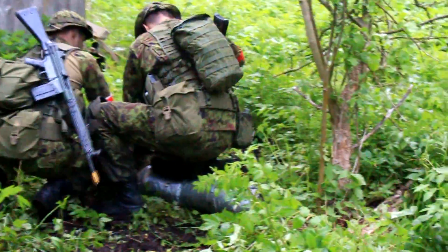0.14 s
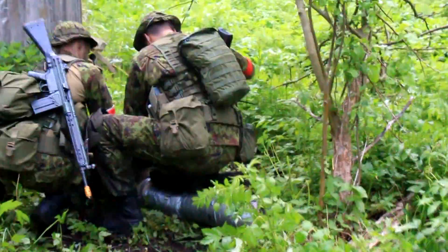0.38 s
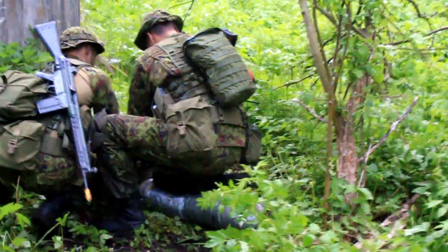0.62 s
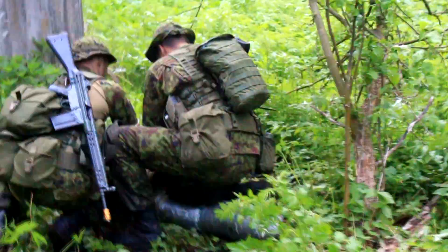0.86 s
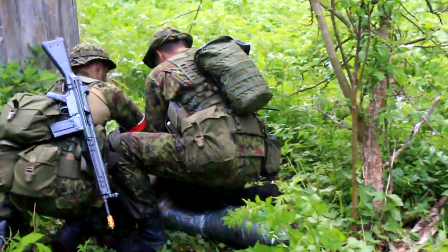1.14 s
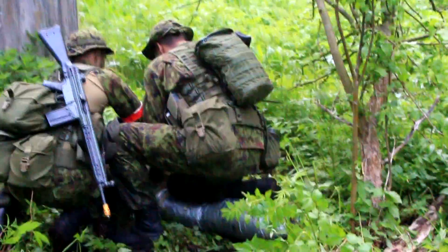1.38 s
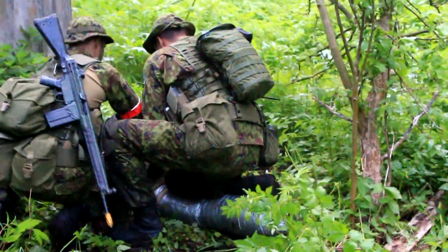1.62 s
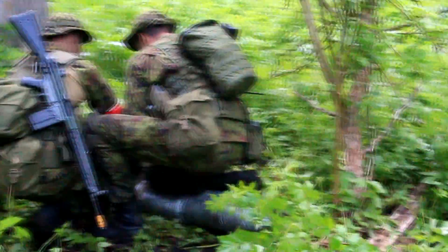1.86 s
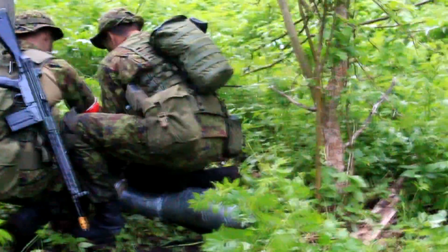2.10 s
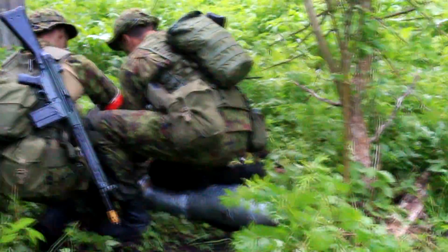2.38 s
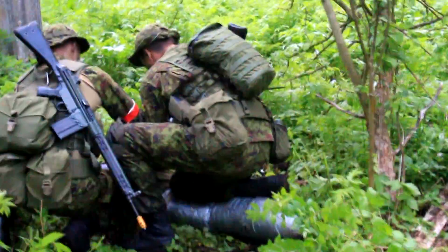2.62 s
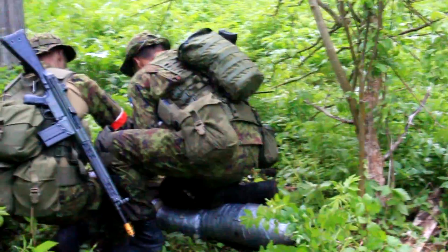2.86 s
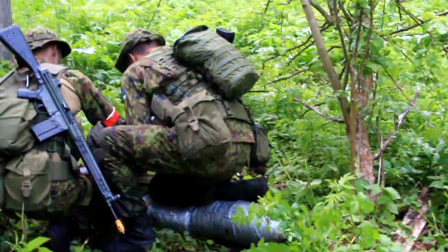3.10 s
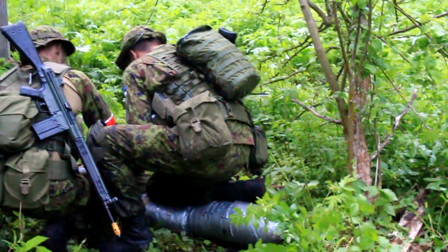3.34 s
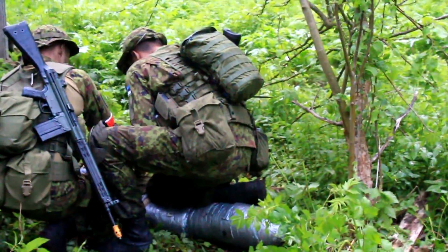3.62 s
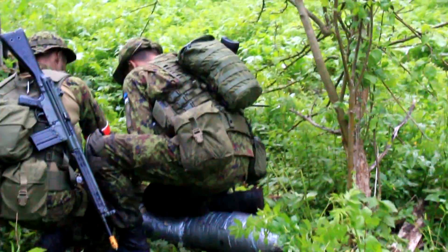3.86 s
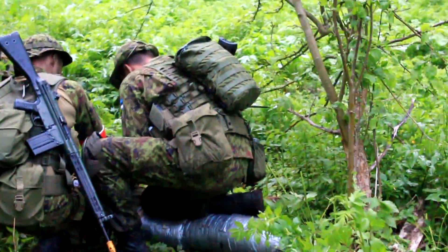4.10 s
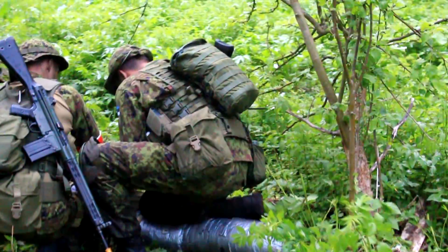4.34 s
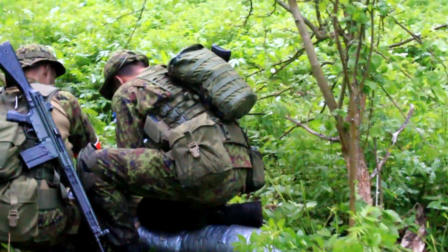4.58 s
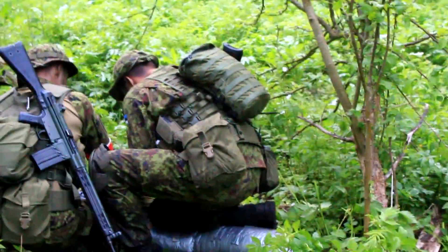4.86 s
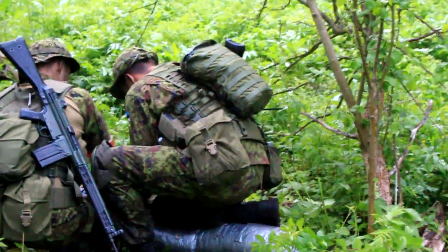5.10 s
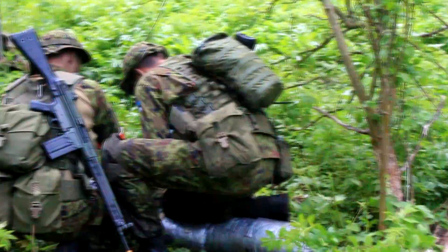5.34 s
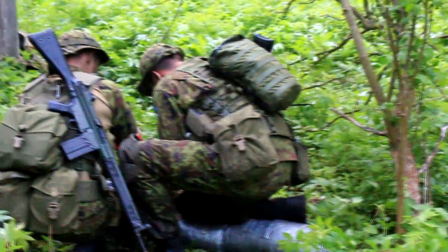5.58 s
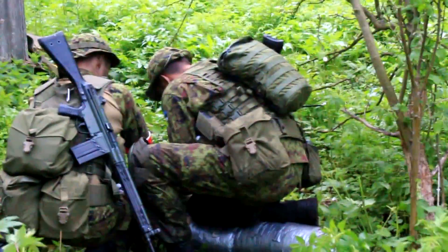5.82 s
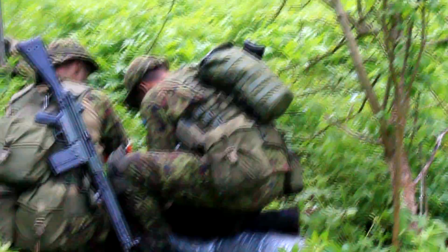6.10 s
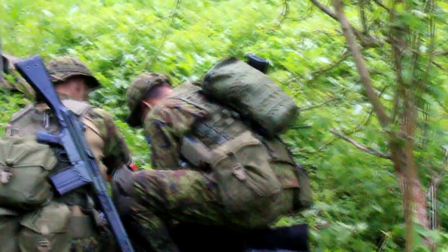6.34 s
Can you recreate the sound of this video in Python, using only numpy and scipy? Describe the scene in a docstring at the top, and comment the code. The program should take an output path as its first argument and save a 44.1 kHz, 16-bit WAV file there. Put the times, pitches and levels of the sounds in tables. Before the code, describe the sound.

Stereo woodland ambience with people shifting in brush close to the microphone: dull thumps, knocks, small snaps and brief cloth swishes, busiest from one and a half to two and a half seconds. A steady little warbler sings throughout most of it. Later, distant birds flick, chirrup and buzz, and the near thrush returns with whistles and a warble that echo softly among the trunks.

```python
"""Woodland undergrowth: a thrush pips close on the right over a low drone and rustling leaves.
A small warbler repeats dropping notes; fainter voices whistle, rasp and chirrup, all as gliding near-pure tones.
Bodies shift in the brush nearby: twigs snap and gear knocks as bursts of decaying modes, cloth swishes as shaped noise.
The bed is spectrally shaped stereo noise with microphone hiss; trunks scatter the birds and blows into noise tails."""
import sys
import numpy as np
from scipy import signal
from scipy.fft import rfft, irfft, next_fast_len
from scipy.io import wavfile
from scipy.ndimage import uniform_filter1d

SR = 44100
rng = np.random.default_rng(int(sys.argv[2]) if len(sys.argv) > 2 else 0)


def wav_record(signal):
    """Record a signal, one row per channel, as 16-bit PCM in the file named by sys.argv[1]."""
    frames = np.transpose(np.atleast_2d(signal))
    bounded = np.clip(frames, -1, 1)
    # unit amplitude maps onto the largest positive 16-bit level
    quanta = np.round(bounded * 32767).astype(np.int16)
    wavfile.write(sys.argv[1], SR, quanta)


def volts_from_decibels(level):
    """Turn decibel levels (scalar or array-like) into linear amplitude factors."""
    exponent = np.asarray(level, float) / 20
    return 10 ** exponent


N = 284445

# whistles of birds further off: (time [s], length [s], start pitch [Hz], end pitch [Hz],
# level before placing [dB], bend [name])
FAR_WHISTLES = [(0.491, 0.07, 2270, 1778, -47.5, "scoop"), (0.894, 0.092, 3900, 3910, -55.5, "glide"),
                (4.682, 0.015, 2920, 1940, -47.5, "glide"), (4.843, 0.035, 2290, 3020, -51.5, "glide"),
                (5.243, 0.037, 2110, 2183, -50, "scoop"), (.53, 0.042, 4570, 4060, -43.5, "droop"),
                (0.965, 0.083, 4500, 3630, -45.5, "glide"), (1.595, 0.049, 3810, 2980, -42, "glide"),
                (1.739, 0.04, 3300, 3390, -41, "scoop"), (1.872, 0.035, 4400, 3700, -47, "lean"),
                (2.869, 0.024, 3834, 3830, -46, "glide"), (3.2, 0.014, 3930, 3870, -45, "glide"),
                (3.811, 0.067, 3190, 3670, -55.5, "glide"), (3.871, 0.044, 3750, 3890, -47, "scoop"),
                (4.503, 0.07, 3564, 5570, -40.5, "droop"), (4.565, 0.072, 5410, 4990, -37.5, "scoop"),
                (4.493, 0.047, 5780, 5860, -49.5, "lean"), (4.694, 0.022, 3260, 2810, -43, "glide"),
                (4.96, 0.012, 4250, 4050, -43, "droop"), (4.965, .016, 3590, 3504, -34.5, "scoop"),
                (4.983, 0.01, 3420, 2690, -38.5, "glide"), (5.122, 0.01, 4750, 4430, -31.5, "scoop"),
                (6.426, 0.036, 5560, 4500, -48, "glide")]
FAINT_DB = -46.2  # far whistles below this level come from deep in the wood


def unit(x):
    """Normalisation by root mean square: scales a signal to rms 1."""
    return x / np.sqrt(np.mean(x ** 2) + 1e-20)


def along(points, hz):
    """Logarithmic frequency scale: interpolates (frequency [Hz], value) points along it."""
    f, v = np.transpose(points)
    return np.interp(np.log(hz + 1), np.log(f + 1), v)


def filtered(x, response):
    """Linear filtering: multiplies the spectrum of x by a response of frequency."""
    m = next_fast_len(N + SR // 4)
    spectrum = rfft(x, m) * response(np.fft.rfftfreq(m, 1 / SR))
    return irfft(spectrum, m)[..., :N]


def add(track, s, sound):
    """Superposition: lays a sound into a track at time s."""
    part = track[round(s * SR):][:len(sound)]
    part += sound[:len(part)]


def sing(hz, level, rough=0.011):
    """Frequency modulation: a syrinx gives nearly a pure tone; moving leaves on the way make it flutter."""
    flutter = 1 + rough * unit(uniform_filter1d(rng.standard_normal(len(hz)), 150))
    phase = 2 * np.pi * np.cumsum(hz) / SR + rng.uniform(0, 2 * np.pi)
    return np.sqrt(2) * level * flutter * np.sin(phase)


def whistles(rows, soft, rough):
    """Pitch glide: each tone bends from its start to its end pitch under a rounded swell."""
    # bend [name]: share of the pitch change done halfway through [ratio]
    halfway = {"scoop": 0.96, "lean": .7, "glide": 0.46, "droop": 0.17}
    out = np.zeros(N)
    for s, length, start_hz, end_hz, db, bend in rows:
        u = np.linspace(0, 1, round(length * SR))
        done = u + (4 * halfway[bend] - 2) * u * (1 - u)
        hz = start_hz + (end_hz - start_hz) * done
        swell = np.abs(np.sin(np.pi * u ** 1.11)) ** soft
        add(out, s, sing(hz, volts_from_decibels(db) * swell, rough))
    return out


def pips(group, length):
    """Rising onset: whistle rows for one group of short pips, which scoop up to their pitch."""
    # "near": the thrush's pips; "far": fainter pips, the first ones perhaps the thrush's, in two voices;
    # each group [name] holds rows of (time [s], final pitch [Hz], level before placing [dB])
    pip_rows = {"near": [(.078, 2666, -32.5), (.107, 2783, -31.5), (.14, 2790, -28.5), (.172, 2647, -33)],
                "far": [(4.365, 3550, -47), (4.412, 3690, -43.5), (4.412, 5700, -45), (4.458, 3760, -45.5),
                (4.458, 5910, -42), (4.805, 2820, -43), (5.203, 3000, -40.5), (5.262, 2990, -43.5)]}
    scoop_hz = 298
    return [(s, length, hz - scoop_hz, hz, db, "scoop") for s, hz, db in pip_rows[group]]


def warbler():
    """Piecewise-linear pitch contour: a steep drop from the top, a held pitch, a weak fall."""
    # notes, shaped in turn: (time the onset ends [s], held level before placing [dB])
    notes = [(0.803, -49), (1.133, -50), (1.457, -45), (1.779, -46.5), (2.094, -48), (2.424, -42.5),
             (2.746, -43.5), (3.082, -44), (3.435, -45.5), (3.752, -45.5), (4.099, -48), (4.46, -44),
             (4.784, -42.5), (5.115, -46.5)]
    # shape [name]: (held pitch [Hz], hold [s], final pitch [Hz], final fall [s],
    # end of the fall over the held part [dB], end of the drop over the held part [dB])
    shapes = {"high": (6000, .022, 3800, .012, -5, 4), "mid": (4520, .026, 3750, .04, -11, 4.5),
              "low": (3770, .066, 3750, .01, -5, 2)}
    # order in which the notes take their shapes [name]
    shape_order = ["high", "low", "mid"]
    top_hz, shoulder_hz = 6910, 6450  # where a note starts and where it turns
    overshoot_hz = 139  # the drop lands this far above the held pitch
    onset_s, drop_s, settle_s, stop_s = .004, .014, .006, .003
    out = np.zeros(N)
    for k, (s, db) in enumerate(notes):
        held_hz, hold, final_hz, fall, fall_db, drop_db = shapes[shape_order[k % len(shape_order)]]
        knots = np.cumsum([0, onset_s, drop_s, settle_s, hold, fall, stop_s])
        t = np.arange(round(knots[-1] * SR)) / SR
        pitches = [top_hz, shoulder_hz, held_hz + overshoot_hz, held_hz, held_hz, final_hz, final_hz]
        hz = uniform_filter1d(np.interp(t, knots, pitches), size=90)
        level_db = db + np.interp(t, knots, [-40, -3, drop_db, 0, 0, fall_db, -40])
        add(out, s - onset_s, sing(hz, volts_from_decibels(level_db), rough=0.45))
    return out


def thrush():
    """Source and resonance: whistles, and warbles that snap up and slide down; the throat favours one band."""
    # whistles: (time [s], length [s], start pitch [Hz], end pitch [Hz],
    # level before throat and placing [dB], bend [name])
    near_whistles = [(.38, 0.037, 4190, 2533, -29.5, "glide"), (5.57, 0.051, 1890, 2566, -42.5, "lean"),
                     (5.624, 0.048, 4410, 4540, -35.5, "scoop"), (5.66, 0.038, 4550, 4920, -30.5, "glide"),
                     (5.635, 0.058, 5080, 5310, -42, "scoop"), (5.84, 0.026, 3440, 3724, -29.5, "lean"),
                     (5.963, 0.02, 1500, 2280, -48, "glide"), (5.98, 0.13, 2236, 2285, -38, "droop"),
                     (6.082, 0.044, 2787, 2030, -38, "glide")]
    # warbles: (time [s], start of mean pitch [Hz], end of mean pitch [Hz], swing rate [1/s],
    # level before envelope, throat and placing [dB])
    warbles = [(0.3121, 2668, 4234, 66, -28.5), (5.769, 3544, 3150, 95, -32.5)]
    warble_s, swing_hz, swing_fades = .072, 720, .35  # the swing loses this share by the end
    out = whistles(near_whistles + pips("near", length=.015), soft=0.47, rough=0.15)
    for s, start_hz, end_hz, rate, db in warbles:
        u = np.linspace(0, 1, round(warble_s * SR))
        turn = u * warble_s * rate % 1
        mean_hz = end_hz + (start_hz - end_hz) * (1 - u) ** 2
        swing = swing_hz * (1 - swing_fades * u) * np.interp(turn, [0, .25, 1], [-1, 1, -1])
        pulse = np.interp(turn, [0, .2, .5, 1], [.3, .6, 1, .3])
        level = pulse * (.6 + .4 * u) * np.clip(30 * (1 - u), 0, 1)
        add(out, s, sing(uniform_filter1d(mean_hz + swing, 40), volts_from_decibels(db) * level))
    return filtered(out, lambda hz: 1 + 1.48 / (1 + ((hz - 3800) / 400) ** 2))


def snaps():
    """Modal excitation: each blow rings the same short modes, strengths and pitches varied, with splinter noise."""
    # snaps and knocks: (time [s], reference level [dB], kind [name])
    blow_rows = [(0.24, -28.5, "thump"), (0.792, -43.5, "tick"), (0.834, -32.5, "knock"),
                 (0.93, -37.5, "snap"), (0.995, -45, "click"), (1.012, -43, "tick"), (1.096, -34, "knock"),
                 (1.503, -31.5, "thump"), (1.596, -28.5, "knock"), (1.62, -38, "thump"),
                 (1.669, -28.5, "tick"), (1.846, -26.5, "thump"), (1.9488, -37.5, "click"),
                 (1.957, -12.5, "crack"), (2.053, -25, "snap"), (2.198, -47.5, "tick"),
                 (2.299, -24.5, "snap"), (2.378, -41.5, "click"), (2.74, -38, "click"),
                 (3.302, -44, "click"), (3.326, -28, "snap"), (3.387, -29, "knock"), (3.425, -45.5, "tick"),
                 (4.105, -39.5, "tick"), (4.245, -34, "knock"), (4.429, -34, "snap"), (4.58, -35, "knock"),
                 (4.659, -42, "knock"), (4.732, -40.5, "snap"), (4.789, -31, "knock"),
                 (5.316, -37.5, "snap"), (5.88, -37.5, "knock"), (5.906, -42, "tick"),
                 (6.269, -42.5, "tick"), (6.362, -38, "snap"), (6.431, -33, "knock")]
    # kind [name], from soft gear on a stem to a dry twig breaking:
    # (crack over reference [dB], tick over reference [dB])
    balance = {"thump": (-13, -32), "knock": (0.5, -12), "snap": (11.1, 0), "crack": (14, -4),
               "click": (15.2, -23), "tick": (17, 8.5)}
    # modes of the stem: (nominal frequency [Hz], relative level [dB], t60 [s])
    stem_modes = [(555, -5.5, 0.029), (695, 4.5, 0.01), (1042, 16, 0.0053)]
    # modes of the split fibres: (nominal frequency [Hz], relative level [dB], t60 [s])
    fibre_modes = [(1900, -14.5, 0.0088), (3220, 5.5, 0.0039), (4220, 11.5, 0.0019), (4850, 11.5, 0.0022)]
    # modes of the bright edge: (nominal frequency [Hz], relative level [dB], t60 [s])
    edge_modes = [(7740, 11, 0.0041), (10600, 8, 0.002), (14000, -21, .003)]
    # a knee or pack meets soft ground: (time [s], frequency [Hz], peak before placing [dB])
    thuds = [(0.423, 102, -41), (2.312, 171, -28.5), (3.562, 320, -39), (3.619, 318, -40)]
    out, t = np.zeros(N), np.arange(SR // 10) / SR
    for s, db, kind in blow_rows:
        crack_db, tick_db = balance[kind]
        parts = ((stem_modes, db - 4.5), (fibre_modes, db + crack_db), (edge_modes, db + tick_db))
        for modes, part_db in parts:
            for hz, mode_db, t60 in modes:
                a, b = rng.standard_normal(2)
                ring = volts_from_decibels(part_db + mode_db + a - 60 * t / t60) * (1 - np.exp(-t / 0.00076))
                add(out, s + .0007, ring * np.sin(2 * np.pi * hz * (1 + b / 25) * t))
        # the kernel removes the lowest and highest frequencies
        splinters = np.convolve(rng.standard_normal(len(t)), [1, 1, -1, -1])[:len(t)]
        add(out, s, volts_from_decibels(db + tick_db - 22.5 - 60 * t / 0.095) * splinters)
    for s, hz, db in thuds:
        swell = (t * hz) ** 2 * np.exp(2 - 2 * t * hz)  # about two soft cycles
        add(out, s, -volts_from_decibels(db) * swell * np.cos(2 * np.pi * hz * t))
    return out


def swishes():
    """Band-limited friction noise: branches drawn over cloth give a quick rise and a slower fall of grit."""
    # strokes: (time [s], length [s], centre frequency [Hz], rms level [dB])
    strokes = [(1.478, 0.62, 690, -47.5), (1.66, 0.091, 3780, -42), (1.95, 0.092, 4420, -48),
               (2.299, 0.068, 6000, -58), (3.334, 0.12, 4900, -53), (4.898, 0.1, 10900, -55),
               (5.051, 0.08, 1320, -46.5)]
    out = np.zeros((2, N))
    for s, length, centre_hz, db in strokes:
        u = np.linspace(0, 1, round(length * SR))
        grain = volts_from_decibels(4.5 * unit(uniform_filter1d(rng.standard_normal(len(u)), 180)))
        grit = rng.standard_normal((2, len(u))) * grain
        edges = np.clip([centre_hz / 2.65, centre_hz * 1.66], 50, SR * .45)
        band = signal.butter(2, edges, "band", fs=SR, output="sos")
        left, other = signal.sosfilt(band, grit)
        stroke = volts_from_decibels(db) * unit(u ** 0.4 * (1 - u))
        add(out[0], s, stroke * unit(left))
        add(out[1], s, stroke * unit(1.6 * left + other))  # partly alike on both sides
    return out


def buzzes():
    """Random frequency modulation: the pitch jumps about faster than the ear follows, a rasp or a blur."""
    # rasped notes, and from 6.09 s blurred echoes of the thrush:
    # (time [s], length [s], start pitch [Hz], end pitch [Hz], level before placing [dB], rasp [name])
    buzz_rows = [(1.25, 0.105, 3880, 4600, -47.5, "hoarse"), (4.87, 0.054, 4850, 4600, -42, "hoarse"),
                 (4.879, 0.087, 4230, 4024, -41, "hoarse"), (4.91, 0.065, 2100, 1900, -50, "hoarse"),
                 (4.947, 0.042, 5000, 4660, -40, "rough"), (4.985, .04, 3600, 2790, -48, "rough"),
                 (5.396, 0.033, 3700, 3430, -45, "rough"), (5.472, 0.045, 4030, 3360, -45.5, "harsh"),
                 (6.094, 0.16, 2450, 2190, -49.5, "rough"), (6.139, 0.13, 3620, 3500, -49, "rough"),
                 (6.246, 0.042, 2346, 1900, -45, "hoarse"), (6.297, 0.041, 2070, 1698, -43.5, "rough")]
    # rasp [name]: rms pitch scatter as a share of the pitch [ratio]
    scatter = {"hoarse": 0.035, "rough": 0.094, "harsh": 0.164}
    out = np.zeros(N)
    for s, length, start_hz, end_hz, db, rasp in buzz_rows:
        u = np.linspace(0, 1, round(length * SR))
        jumps = unit(uniform_filter1d(uniform_filter1d(rng.standard_normal(len(u)), 35), 35))
        hz = (start_hz + (end_hz - start_hz) * u) * (1 + scatter[rasp] * jumps)
        swell = np.abs(np.sin(np.pi * u)) ** 0.12
        add(out, s, sing(hz, volts_from_decibels(db) * swell, rough=0.52))
    return out


def chirrups():
    """Two-voiced tones: each voice throws its pitch up in an arch and back down."""
    # calls: (time [s], level before placing [dB])
    calls = [(5.379, -37.5), (5.459, -35)]
    # pitch arches of a call: (delay [s], length [s], start pitch [Hz], top pitch [Hz], end pitch [Hz],
    # level relative to the call [dB])
    arches = [(0, .017, 3840, 5510, 3770, -1), (.001, 0.015, 2900, 3640, 3020, -3.5),
              (.018, .03, 3960, 5100, 3900, -3)]
    out = np.zeros(N)
    for s, db in calls:
        for delay, length, start_hz, top_hz, end_hz, arch_db in arches:
            u = np.linspace(0, 1, round(length * SR))
            rise_hz = top_hz - (start_hz + end_hz) / 2
            hz = start_hz + (end_hz - start_hz) * u + rise_hz * np.sin(np.pi * u)
            swell = np.abs(np.sin(np.pi * u)) ** .5
            add(out, s + delay, sing(hz, volts_from_decibels(db + arch_db) * swell, rough=.3))
    return out


def fainter_birds(count=5):
    """Gliding tones: whistles, fainter pips, upward flicks, chirrups and a thin high series loudest mid-way."""
    # quick upward flicks: (time [s], start pitch [Hz], end pitch [Hz], level before placing [dB])
    flick_rows = [(4.717, 3020, 5050, -31.5), (5.116, 2890, 4980, -39.5), (5.237, 2650, 3220, -35)]
    flicks = [(s, .012, start_hz, end_hz, db, "lean") for s, start_hz, end_hz, db in flick_rows]
    # a thin high bird repeats one drooping note at a steady pace
    first_s, every_s, seep_s = .655, .146, .065
    seep_hz, seep_end_hz = 7550, 7150
    seeps = []
    for k in range(count):
        seep_db = -61 + 6 * np.sin(np.pi * (k + .5) / count)
        seeps.append((first_s + k * every_s, seep_s, seep_hz, seep_end_hz, seep_db, "droop"))
    clear = [row for row in FAR_WHISTLES if row[4] >= FAINT_DB]
    rows = clear + pips("far", length=0.0206) + flicks + seeps
    return chirrups() + whistles(rows, soft=0.083, rough=0.33)


def deep_birds():
    """Level as a distance cue: the faintest whistles, from deep in the wood."""
    return whistles([row for row in FAR_WHISTLES if row[4] < FAINT_DB], soft=0.27, rough=0.23)


def rush(spectrum, patchy_db, grains=0, grain_db=0):
    """Shaped noise with set interaural correlation: rms 1, patches of gain, sparse crackles (grains a second)."""
    # left-right likeness: (frequency [Hz], correlation [ratio])
    likeness = [(40, 0.31), (130, 0.94), (600, 0.33), (4000, 0.46), (11000, -0.26)]
    z = signal.stft(rng.standard_normal((2, N)), nperseg=512)[2]
    field = uniform_filter1d(uniform_filter1d(rng.standard_normal(z.shape[1:]), 5, 0), 8, 1)
    pair = unit(signal.istft(z * volts_from_decibels(patchy_db * unit(field)), nperseg=512)[1][:, :N])
    strength = volts_from_decibels(grain_db + 4 * rng.exponential(size=N).clip(0, 2.5))
    spikes = (rng.random(N) < grains / SR) * strength
    # each crackle flares and dies in a millisecond or two
    pair = pair * (1 + np.convolve(spikes, np.exp(-np.arange(200) / 40))[:N])

    def mid_side(hz):
        turn = np.arccos(np.clip(along(likeness, hz), -1, 1)) / 2
        colour = volts_from_decibels(along([(1, -120)] + spectrum + [(SR, -120)], hz))
        return colour * [np.cos(turn), np.sin(turn)]

    mid, side = filtered(pair, mid_side)
    return unit(np.array([mid + side, mid - side]))


def bed():
    """Shaped noise under slow levels: drone in two humps, crackling leaves, microphone hiss, blurred far song."""
    # slow levels: (time [s], drone level before tilt [dB], leaf rustle level [dB],
    # far chorus level before tilt [dB])
    slow_levels = [(0, -52, -49.5, -45.5), (.7, -47.5, -48.5, -46), (1.2, -52.5, -49, -49.5),
                   (1.9, -55, -58, -45.5), (2.2, -53, -53.5, -51), (2.9, -49.5, -55.5, -52.5),
                   (3.6, -52.5, -52.5, -52.5), (4.1, -52.5, -54.5, -52.5), (4.9, -56, -53.5, -49.5),
                   (5.4, -49, -50.5, -49), (6, -50, -50, -49.5), (6.45, -49.5, -57, -52)]
    # drone spectrum: (frequency [Hz], relative density [dB])
    drone_colour = [(30, -26), (70, -16.5), (130, 0), (195, -10.5), (255, -4.5), (340, -14.5), (500, -20.5)]
    # leaf rustle spectrum: (frequency [Hz], relative density [dB])
    leaf_colour = [(150, -20), (400, 2), (1100, 1.5), (1800, -3), (4000, -10), (8000, -30), (12000, -33)]
    # smooth high microphone hiss spectrum: (frequency [Hz], relative density [dB])
    hiss_colour = [(2500, -20), (6500, 2), (10000, -2), (15500, -5.5)]
    # distant song spectrum: (frequency [Hz], relative density [dB])
    chorus_colour = [(1800, -9), (2700, -6.5), (3800, -1), (5200, -5.5), (6400, -11), (7500, -11),
                     (9000, -18.5)]
    s, *columns = np.transpose(slow_levels)
    t = np.arange(N) / SR
    drone, leaves, chorus = (volts_from_decibels(np.interp(t, s, column)) for column in columns)
    rustle = leaves * rush(leaf_colour, patchy_db=2.5, grains=44, grain_db=4.0)
    hiss = volts_from_decibels(-64) * rush(hiss_colour, patchy_db=.4, grains=12, grain_db=4)
    # drone and chorus lean slightly to the right
    hum = drone * rush(drone_colour, patchy_db=2) * volts_from_decibels([[-.8], [.8]])
    song = chorus * rush(chorus_colour, patchy_db=1.8) * volts_from_decibels([[-1], [1]])
    return rustle + hiss + hum + song


def trees(x, stretch):
    """Diffuse scattering: trunks and leaves return a decaying noise tail, a new one each third of a second."""
    # decay of the wood: (frequency [Hz], t60 before stretch [s])
    wood_decay = [(300, .3), (2000, .65), (5000, .7), (12000, .2)]
    out, step = np.zeros((2, N + 2 * SR)), SR // 3
    for i in range(0, N, step):
        hz, t, z = signal.stft(rng.standard_normal((2, SR * 3 // 5)), SR, nperseg=256)
        t60 = stretch * along(wood_decay, hz)[:, None]
        tail = signal.istft(z * volts_from_decibels(-60 * t / t60), SR, nperseg=256)[1]
        wet = signal.fftconvolve(x[None, i:i + step], tail / np.linalg.norm(tail[0]), axes=1)
        out[:, i + 150:i + 150 + wet.shape[1]] += wet  # the tail starts 150 samples late
    return out[:, :N]


def scene():
    """Level and phase differences place the sources; each but swishes and bed has a share of the wood's echo."""
    # lead of a near blow on the left: (frequency [Hz], phase lead [rad])
    left_lead = [(5500, 0.4), (8100, 1.3), (10400, 1.8), (16000, 2.2)]
    near, small, blows = thrush(), warbler(), snaps()
    fainter, deep = fainter_birds() + buzzes(), deep_birds()
    pair = filtered(blows, lambda hz: np.exp(.5j * np.outer([1, -1], along(left_lead, hz))))
    # gains in dB, left then right
    direct = near * volts_from_decibels([[-5.5], [3]]) + small * volts_from_decibels([[.3], [-.3]]) + fainter * volts_from_decibels([[-3.5], [-1]])
    direct = direct + volts_from_decibels(-1.5) * deep + pair * volts_from_decibels([[.8], [-.8]])
    echo = trees(volts_from_decibels(-4.5) * near, stretch=0.67)
    echo = echo + trees(volts_from_decibels(-5) * small + volts_from_decibels(-5.5) * fainter, stretch=0.56)
    echo = echo + trees(volts_from_decibels(-1.0) * deep, stretch=0.49)
    echo = echo + trees(volts_from_decibels(-13.5) * blows, stretch=0.21)
    return direct + echo + swishes() + bed()


def low_pass(x):
    """Removes everything above the highest recorded frequency."""
    return signal.sosfilt(signal.butter(12, 16470, fs=SR, output="sos"), x)


def record(dry):
    """Soft saturation and band limiting: the input bends toward 1.05 and keeps nothing above its band edge."""
    top_edge_hz = 16400
    soft = dry / (1 + np.abs(dry / 1.05) ** 8) ** (1 / 8)
    mix = filtered(soft, lambda hz: hz < top_edge_hz)
    return low_pass(mix)


dry = scene()
out = record(dry)
wav_record(out)
```